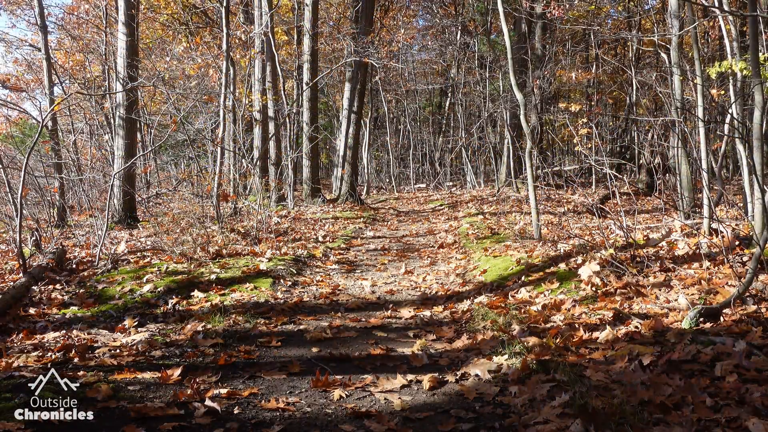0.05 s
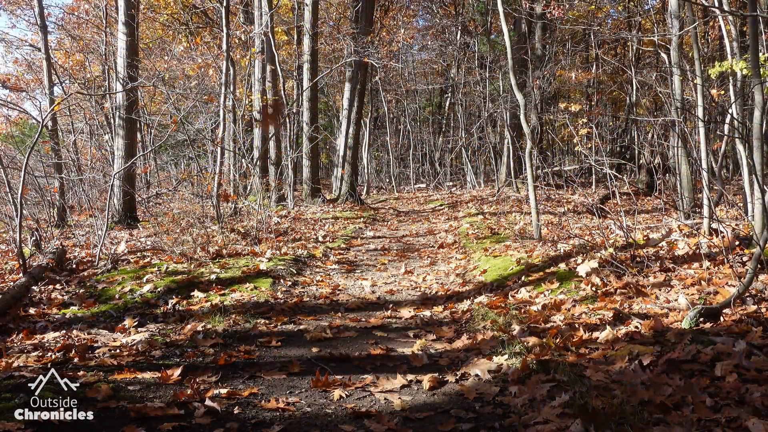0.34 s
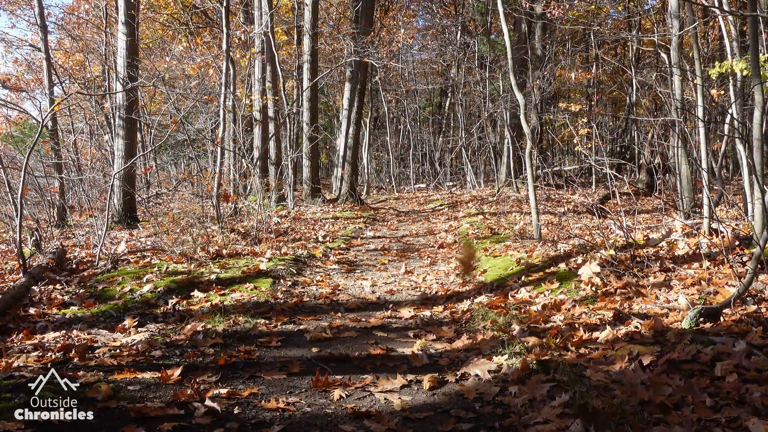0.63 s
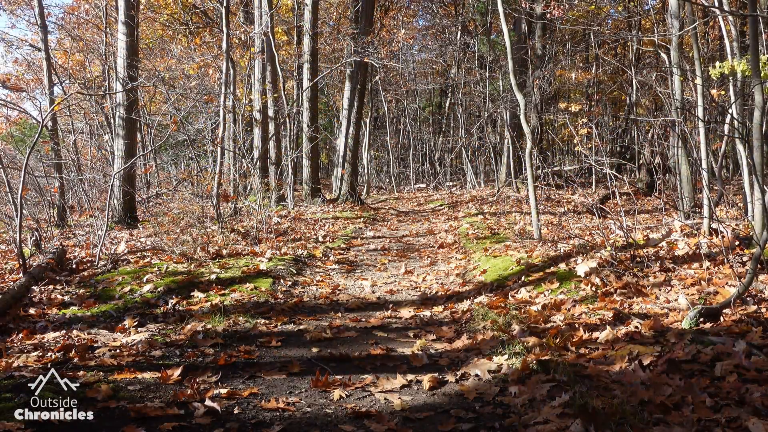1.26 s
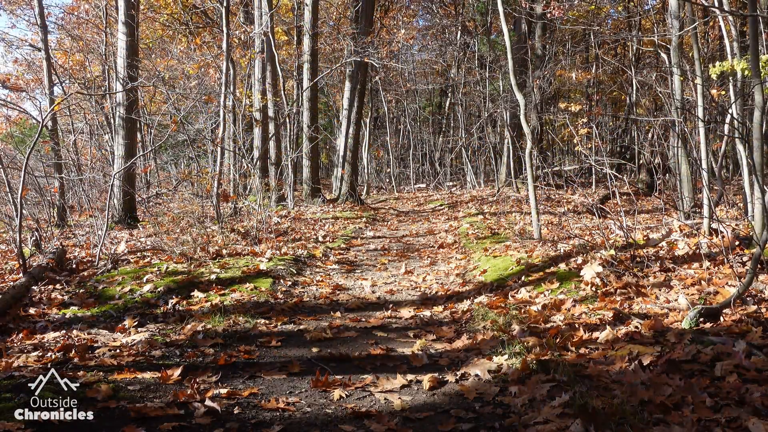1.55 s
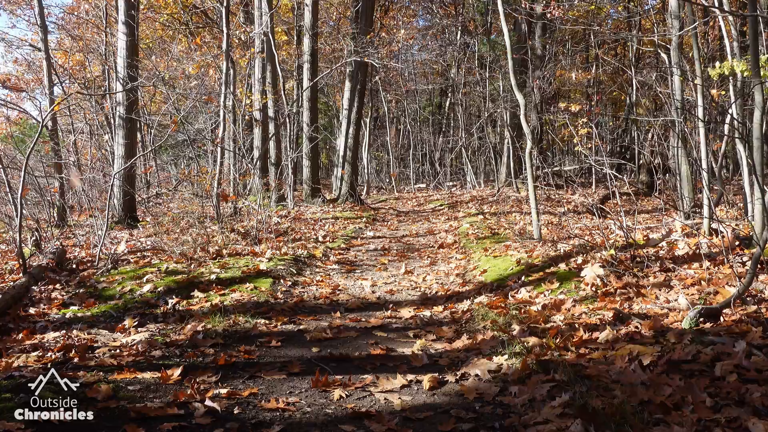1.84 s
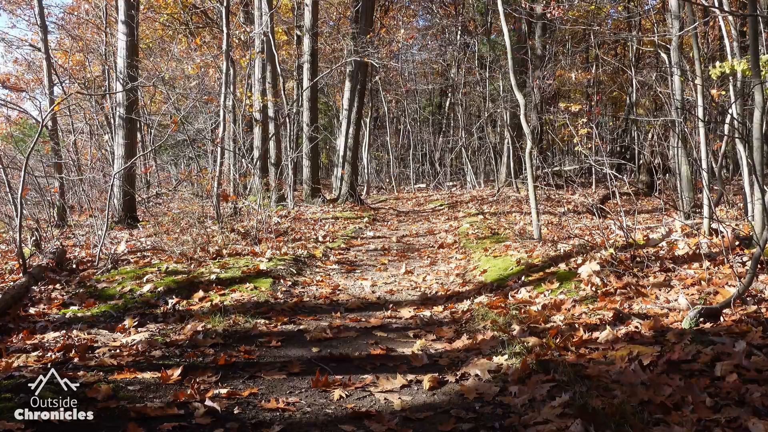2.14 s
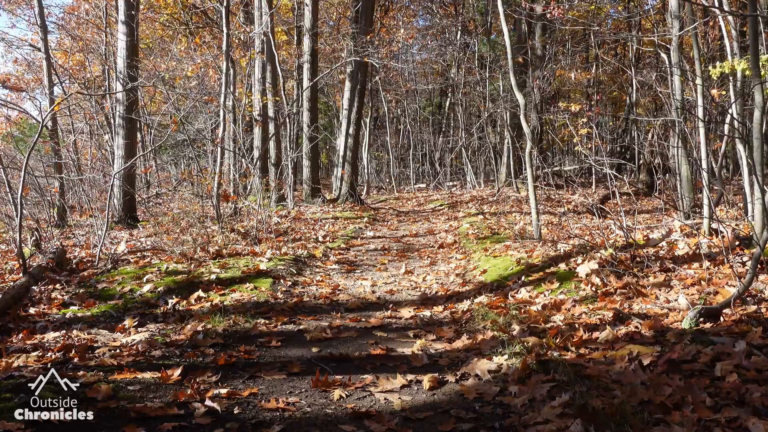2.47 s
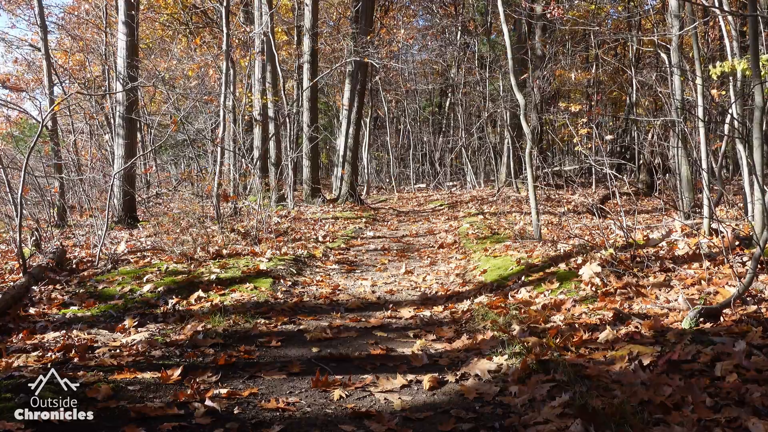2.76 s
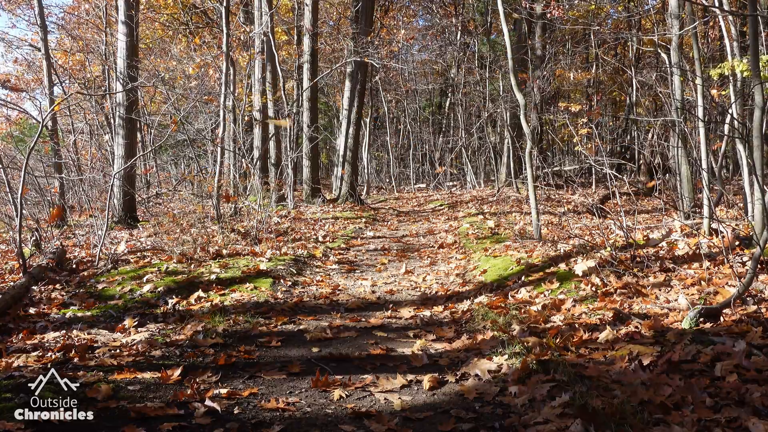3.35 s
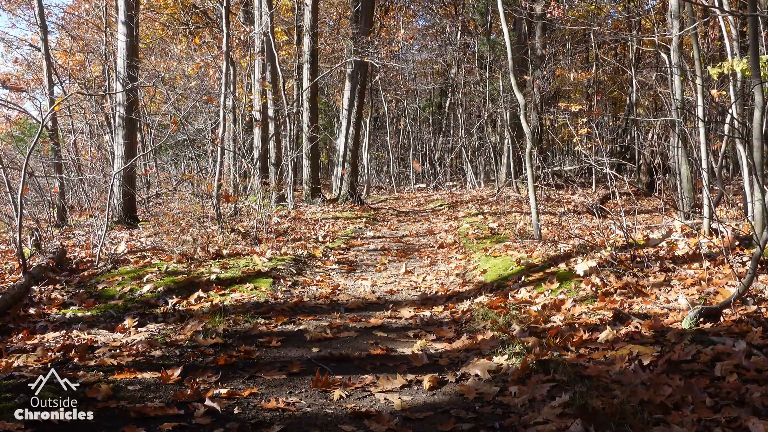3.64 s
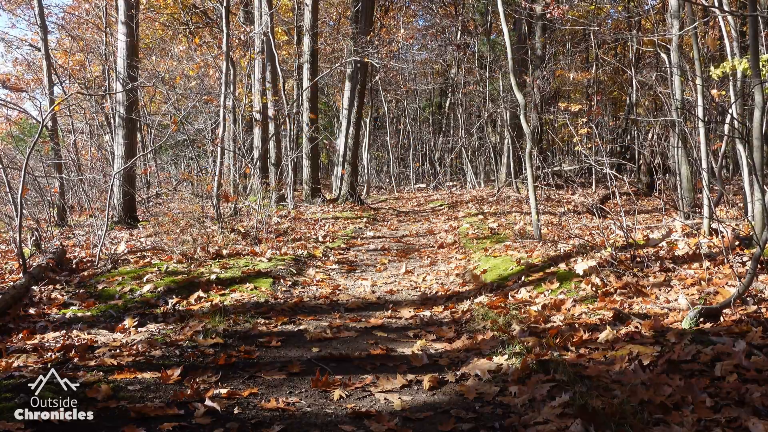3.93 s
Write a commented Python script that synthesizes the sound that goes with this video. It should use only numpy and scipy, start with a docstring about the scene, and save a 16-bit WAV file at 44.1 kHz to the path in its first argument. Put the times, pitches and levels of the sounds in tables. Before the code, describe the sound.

Wind rustles dry leaves in a wood throughout, a steady hiss over a faint low murmur. Nearby fallen leaves scrape and tick, most around 1.5 seconds and again after 3 seconds. Wind buffets the microphone with soft low bumps that thin out after 3 seconds. A very distant horn, perhaps a train's, emerges faintly near 3 seconds and swells slightly at about 3.7 seconds.

```python
"""An autumn wood in the wind. Countless small impacts of dry leaves in the crowns sum to a steady
hiss over a far murmur; on the litter nearby, leaves scrape by friction and tick as they snap.
Turbulent eddies press on the two microphone ports as soft bumps that thin out towards the end,
when a very distant horn, perhaps a train's, comes through."""
import sys
import numpy as np
from scipy import signal
from scipy.fft import rfft, irfft
from scipy.io import wavfile

SR = 44100
rng = np.random.default_rng(int(sys.argv[2]) if len(sys.argv) > 2 else 0)


def generate_wav(signal):
    """Clip the signal to [-1, 1] and save it as 16-bit WAV at the path in sys.argv[1]."""
    frames = np.transpose(np.atleast_2d(signal))
    scaled = np.clip(frames, -1, 1) * 32767
    pcm = np.round(scaled).astype(np.int16)
    wavfile.write(sys.argv[1], SR, pcm)


N = 176400
T, HZ = np.arange(N) / SR, np.fft.rfftfreq(N, 1 / SR)

# spectrum of the leaves in the crowns (frequency [Hz], relative density [dB])
LEAF_SPECTRUM = [(500, -8.5), (800, -10.5), (1160, -9), (1800, -5), (2600, -2.5), (4800, -0.5), (6300, -3),
                 (7800, -5.5), (9500, -13), (12000, -14), (13200, -17), (15800, -20)]
# envelope of their rustle (time [s], relative level [dB])
RUSTLE_ENVELOPE = [(0.0, -40), (0.01, -38), (1.64, -37), (1.65, -39), (1.73, -37.5), (2.51, -38),
                   (2.6, -37), (3.03, -38.5), (3.06, -35), (3.12, -39.5), (3.23, -34), (3.29, -38),
                   (3.78, -36.5), (3.79, -36.5), (3.82, -36), (3.84, -36.5), (3.95, -37.5), (4.0, -37.5)]


def amp(db):
    """Amplitude grows tenfold for every 20 dB."""
    return 10 ** (np.asarray(db) / 20)


def unit(x):
    """Normalisation to an rms of 1."""
    return x / np.sqrt(np.mean(x ** 2) + 1e-20)


def at_hz(points, hz=HZ):
    """Interpolation on a logarithmic frequency axis."""
    f, value = np.transpose(points)
    return np.interp(np.log(hz + 1), np.log(f), value)


def at_time(points):
    """Linear interpolation at every sample."""
    return np.interp(T, *np.transpose(points))


def add(mix, start_s, sound):
    """Superposition: a sound adds to the mix from its start time."""
    start = round(start_s * SR)
    part = mix[:, max(start, 0):max(start + sound.shape[-1], 0)]
    part += sound[:, max(-start, 0):][:, :part.shape[1]]


def shaped(x, gain):
    """Zero-phase filtering: the spectrum is multiplied by gain(frequency)."""
    size = x.shape[-1]
    return irfft(rfft(x) * gain(np.fft.rfftfreq(size, 1 / SR)), size)


def drift(rate_hz, size=N):
    """Low-passed noise gives a slow random fluctuation of rms 1."""
    return unit(shaped(rng.standard_normal(size), lambda f: 1 / (1 + (f / rate_hz) ** 2)))


def resonance(x, hz, width_oct):
    """A resonance favours one band, here a Gaussian on the octave scale."""
    return shaped(x, lambda f: np.exp(-0.5 * (np.log2((f + 1) / hz) / width_oct) ** 2))


def crown_hiss(shimmer_db=0.98, gain_db=-1):
    """Incoherent summation: countless far leaves merge into noise whose bands shimmer a little."""
    centres_hz = np.geomspace(1000, 16000, 7)
    hiss = 0
    for weights in np.eye(len(centres_hz)):
        band = shaped(rng.standard_normal((2, N)), lambda f: np.sqrt(np.interp(f, centres_hz, weights)))
        hiss = hiss + band * amp(shimmer_db * drift(rate_hz=18))
    hiss = unit(shaped(hiss, lambda f: amp(at_hz(LEAF_SPECTRUM, f))))
    return hiss * amp(at_time(RUSTLE_ENVELOPE) + gain_db + 0.1 * drift(rate_hz=16))


def leaf_patter(leaves=36, taps_per_s=1100, ring_s=0.00057, rattle_s=0.0074, gain_db=-5.5):
    """Shot noise: nearer leaves collide at random, each tap exciting a leaf's damped response."""
    t = np.arange(1024) / SR
    decay = np.exp(-t / ring_s) + amp(-15) * np.exp(-t / rattle_s)
    patter = 0
    for hz in np.geomspace(1500, 15000, leaves):
        leaf = resonance(rng.standard_normal((2, len(t))), hz, width_oct=0.5)
        response = unit(leaf * decay) * np.sqrt(hz)
        struck = rng.random(N) < taps_per_s / leaves / SR
        taps = struck * amp(3 * np.minimum(rng.exponential(1, N), 4.2))  # a few stand out
        patter = patter + signal.oaconvolve(taps[None], response, axes=1)[:, :N]
    # the colour of the crowns with the treble lifted
    patter = shaped(patter, lambda f: amp(at_hz(LEAF_SPECTRUM, f) + 4 * np.log2(1 + f / 7400)))
    clumps_db = 2.6 * drift(rate_hz=20)
    return unit(patter) * amp(at_time(RUSTLE_ENVELOPE) + gain_db + clumps_db)


def far_murmur(level_db=-47):
    """Stationary noise, strongest in the bass, is the far background of the wood."""
    # spectrum of the murmur (frequency [Hz], relative density [dB])
    spectrum = [(20, -38), (50, -2), (110, 10), (210, -13), (330, -19), (600, -17.5), (1000, -19),
                (2000, -25)]
    return amp(level_db) * unit(shaped(rng.standard_normal((2, N)), lambda f: amp(at_hz(spectrum, f))))


def turbulence(envelope, edge_hz, balance_db, low_cut_hz=93.3, correlation=0.43):
    """Turbulent pressure is local, so its low noise is only partly correlated between the ports."""
    def band(f):
        return 1 / np.sqrt((1 + (low_cut_hz / (f + 1)) ** 6) * (1 + (f / edge_hz) ** 7.1))

    mid, side = (unit(shaped(x * envelope, band)) for x in rng.standard_normal((2, len(envelope))))
    side = unit(side - mid * np.mean(mid * side))  # orthogonal to mid
    mid, side = mid * np.sqrt(1 + correlation), side * np.sqrt(1 - correlation)
    return unit(np.array([(mid + side) * amp(balance_db), mid - side]))


def wind_on_microphone(lumps_db=4, flutter_db=3.5):
    """Pseudo-sound: the flow's own pressure makes a lumpy rumble, and single eddies bump through it."""
    # wind between the eddies (time [s], relative level [dB])
    breeze_envelope = [(0, -31.5), (.17, -27), (.27, -46), (.36, -37.5), (.48, -33.5), (.55, -46),
                       (.7, -32), (.88, -38.5), (1.03, -27), (1.15, -36.5), (1.45, -29.5), (1.72, -43),
                       (1.83, -27.5), (1.92, -55), (2.0, -33), (2.17, -41), (2.4, -35), (2.78, -39),
                       (2.97, -31), (3.17, -48.5), (3.3, -41), (3.54, -50.5), (3.68, -44), (4, -46)]
    # eddies at the ports (peak time [s], half-power length [s], level [dB], upper edge [Hz],
    # left minus right [dB])
    eddies = [(.007, 0.0054, -17.5, 310, 1), (0.071, 0.013, -28, 400, 2), (.125, 0.018, -35, 220, 5),
              (.180, 0.014, -30.5, 210, 5), (0.366, 0.028, -30.5, 190, 3), (0.41, 0.0068, -24, 348, 3),
              (0.422, .009, -21.5, 406, -2), (0.505, 0.0091, -29, 374, 0), (0.586, 0.0062, -32, 300, -1),
              (0.621, 0.011, -21, 240, 0), (0.677, 0.0056, -29, 310, -3), (0.782, 0.017, -33.5, 297, -1),
              (1.001, 0.039, -24, 263, 0), (1.05, 0.038, -27.5, 380, 4), (1.106, 0.0075, -24.5, 210, 2),
              (1.207, 0.017, -26.5, 295, -1), (1.287, 0.024, -24.5, 260, -3.5), (1.372, 0.014, -27, 293, 1),
              (1.412, 0.0086, -23, 209, 6), (1.576, 0.0072, -24, 202, -3), (1.638, 0.015, -21.5, 261, -1),
              (1.827, .023, -33, 300, 3), (1.866, 0.01, -30, 199, 11), (2.043, 0.016, -27.5, 230, 2),
              (2.253, 0.012, -35, 240, 8), (2.294, 0.015, -32.5, 227, 2), (2.346, 0.0071, -25, 300, 5),
              (2.403, .014, -29, 280, 14), (2.526, 0.0072, -25, 221, 4), (2.596, 0.022, -32.5, 290, -3),
              (2.651, .016, -30.5, 330, -2), (2.733, 0.024, -32, 190, 6), (2.868, 0.0084, -23, 190, 3),
              (2.923, 0.013, -34, 290, 10), (2.955, 0.021, -32, 200, 1), (3.326, 0.01, -34, 235, 8),
              (3.456, 0.009, -33, 300, 3), (3.484, .022, -32, 158, 4), (3.612, 0.017, -34.5, 176, 16),
              (3.671, 0.015, -31, 253, 14)]
    breeze = amp(at_time(breeze_envelope) - 2)
    lumps = amp(lumps_db * np.clip(drift(rate_hz=50), -2, 1.5))
    wind = turbulence(breeze * lumps, edge_hz=222, balance_db=2) * np.sqrt(np.mean(breeze ** 2))
    t = (np.arange(8192) - 4096) / SR
    for peak_s, length_s, level_db, edge_hz, balance_db in eddies:
        bump = amp(level_db) * np.exp(-(t / length_s) ** 2 * 2 * np.log(2))
        flutter = amp(flutter_db * drift(rate_hz=107, size=len(t)))
        eddy = turbulence(bump * flutter, edge_hz, balance_db) * np.sqrt(np.mean(bump ** 2))
        add(wind, peak_s + t[0], eddy)
    return wind


def leaf_scrapes(grains_per_s=7000, noise_floor=0.43, rise_s=0.0034):
    """Sliding friction: a leaf lands and skids in a swarm of crackles that starts fast and dies away."""
    # slides over the litter (time [s], decay time [s], level [dB], treble tilt [dB/octave])
    slides = [(0.129, .02, -40, -10), (0.354, 0.009, -35.5, 4), (.607, 0.013, -32.5, 1.5),
              (0.635, .03, -38.5, -2), (.680, 0.022, -37, -1), (0.802, 0.026, -34, -6),
              (0.87, 0.028, -36.5, 1), (1.305, .019, -38, 10), (1.480, .016, -32.5, -3),
              (1.52, 0.038, -32, -3.5), (1.572, .02, -37.5, -7), (1.646, 0.053, -36, -7),
              (1.731, 0.0093, -35, -3), (1.993, .011, -34, 1), (2.084, .009, -43, -2),
              (2.101, 0.0083, -44, -3), (2.259, .013, -38, 3), (2.458, 0.024, -35, -3),
              (2.584, 0.0092, -31, 0.5), (2.60, 0.088, -36, -4.5), (2.702, .01, -35, -2.5),
              (3.044, 0.014, -47, -1), (3.169, 0.02, -32.5, -3.5), (3.215, .018, -30, -3.5),
              (3.233, 0.016, -34, 1), (3.556, .010, -35, -2), (3.664, .010, -32.5, -2.5),
              (3.72, 0.015, -32, -4.5), (3.797, 0.025, -36, -2.5), (3.881, 0.0076, -32.5, -3),
              (3.979, .025, -34, -2)]
    # spectrum of the friction noise (frequency [Hz], relative density [dB])
    spectrum = [(400, -36), (1200, -9.5), (2200, -4), (4500, 1.5), (7500, 0.5), (10000, -4.5), (15500, -8)]
    t = np.arange(8192) / SR
    scrapes = np.zeros((2, N))
    for start_s, decay_s, level_db, tilt in slides:
        def colour(f):
            return amp(at_hz(spectrum, f) + tilt * np.log2(np.maximum(f, 2200) / 7400))

        noise = rng.standard_normal((2, len(t)))
        grains = noise * (noise_floor + (rng.random(len(t)) < grains_per_s / SR))
        attack = np.minimum(t / rise_s, 1)
        decay = np.exp(-(np.maximum(t - rise_s, 0) / decay_s) ** 1.1)
        add(scrapes, start_s, unit(shaped(grains, colour)) * attack * decay * amp(level_db))
    return scrapes


def leaf_ticks(ring_s=0.00059, scatter_s=0.015, scatter_db=-22):
    """Brittle fracture: a dry stalk or leaf edge snaps, rings briefly and scatters off the litter."""
    # snaps (time [s], level [dB], centre frequency [Hz], width [octaves])
    snaps = [(.1325, -24, 2700, 0.8), (.6110, -24, 3940, .8), (0.685, -23.5, 3700, .5),
             (1.3360, -18.5, 5060, .3), (1.6440, -25, 4100, 0.63), (1.664, -20, 3340, 0.78),
             (1.6826, -21, 4870, 0.23), (1.807, -18, 2700, .55), (2.087, -21.5, 3900, 1.0),
             (3.1848, -22.5, 3580, .4), (3.2243, -21.5, 5200, 0.86), (3.2514, -23.5, 5000, .6),
             (3.4762, -21, 6000, 0.21), (3.4980, -22, 5100, .4), (3.8236, -15, 2750, 0.86),
             (3.8275, -21, 2380, 0.99), (3.9812, -19.5, 6240, 0.43)]
    t = (np.arange(2048) - 128) / SR
    decay = (t >= 0) * (np.exp(-abs(t) / ring_s) + amp(scatter_db) * np.exp(-abs(t) / scatter_s))
    ticks = np.zeros((2, N))
    for start_s, level_db, hz, width_oct in snaps:
        snap = resonance(decay * rng.standard_normal((2, len(t))), hz, width_oct)
        snap *= np.linalg.norm(decay) / np.linalg.norm(snap, axis=1, keepdims=True)
        add(ticks, start_s + t[0], amp(level_db) * snap)
    return ticks


def far_horn(waver_db=0.6, waver_hz=1.7):
    """Propagation through moving air makes a horn's steady tones waver in level and pitch."""
    # tones of the horn (frequency [Hz], relative level [dB])
    tones = [(436, -12), (507, -6), (637, -1), (868, -20), (1017, -21)]
    # its swell as the wind carries it (time [s], gain [dB])
    swell = [(2.2, -75), (2.75, -59.5), (3.0, -55), (3.35, -60), (3.52, -51.5), (3.68, -47), (3.83, -55),
             (4, -56.5)]
    chord = 0
    for hz, level_db in tones:
        amplitude = amp(level_db + waver_db * drift(rate_hz=6))
        phase = 2 * np.pi * np.cumsum(hz + waver_hz * drift(rate_hz=11.6)) / SR
        chord = chord + amplitude * np.sin(phase)
    return np.sqrt(2) * chord * amp(at_time(swell))


def microphone_ports(pair):
    """Partial coherence: two close ports hear much the same field, a little apart in level and phase."""
    # likeness of the ports (frequency [Hz], coherence [0-1])
    likeness = [(60, 0.16), (300, 0.4), (740, 0.84), (1200, 0.88), (2000, .98), (3300, .98), (5500, 0.95),
                (9000, 0.65), (15000, .76)]
    # level difference (frequency [Hz], left minus right [dB])
    balance = [(500, -0.5), (1200, -0.7), (2700, 0), (4500, 0.1), (6400, 0), (9000, -3), (12000, -.8),
               (15000, -.3)]
    # phase difference (frequency [Hz], lead of the left port [rad])
    lead = [(800, -0.034), (5300, 0.079), (8500, -0.3), (10800, 0.063), (15900, .1)]
    mid, side = rfft(pair)
    coherence = at_hz(likeness)
    mid, side = mid * np.sqrt((1 + coherence) / 2), side * np.sqrt((1 - coherence) / 2)
    lean = amp(at_hz(balance) / 2) * np.exp(0.5j * at_hz(lead))  # half to each port
    return irfft(np.array([(mid + side) * lean, (mid - side) / lean]), N)


def scene():
    """Superposition: the wood's sound, the wind striking the ports, and the horn alike in both."""
    wood = crown_hiss() + leaf_patter() + far_murmur() + leaf_scrapes() + leaf_ticks()
    horn = far_horn()
    return microphone_ports(wood) + wind_on_microphone() + horn


def record(dry, low_cut_hz=38, high_cut_hz=15850):
    """Band limiting removes the deepest rumble and the top of the treble."""
    high_pass = signal.butter(2, low_cut_hz, btype="high", fs=SR, output="sos")
    low_pass = signal.firwin(701, high_cut_hz, window=("kaiser", 9), fs=SR)
    return signal.oaconvolve(signal.sosfilt(high_pass, dry), low_pass[None], "same")


dry = scene()
out = record(dry)
generate_wav(out)
```